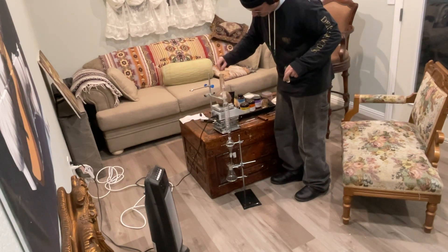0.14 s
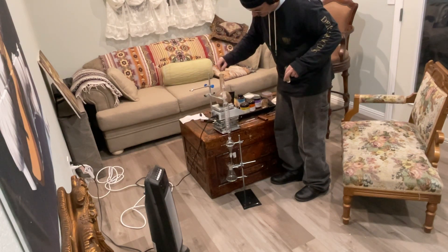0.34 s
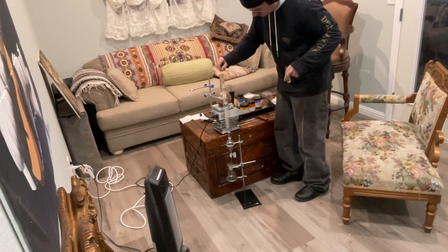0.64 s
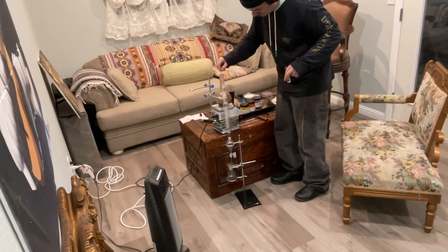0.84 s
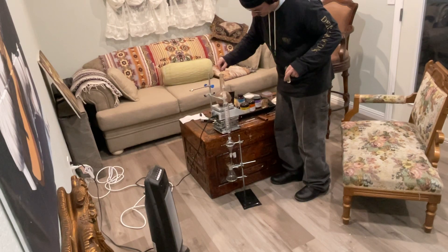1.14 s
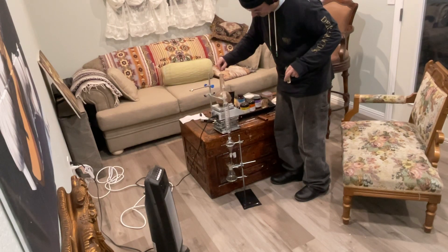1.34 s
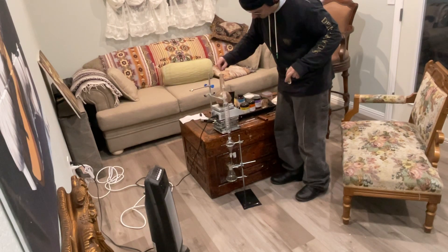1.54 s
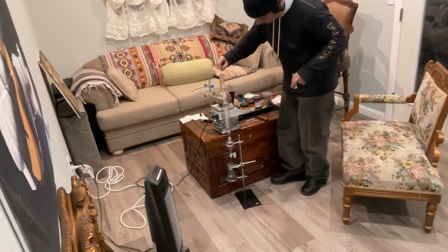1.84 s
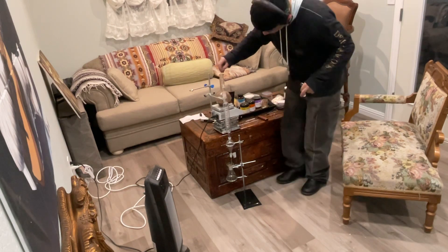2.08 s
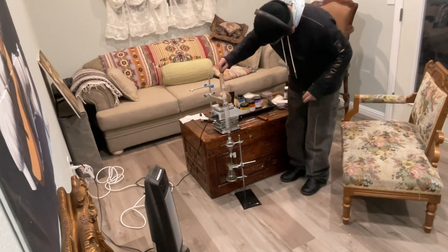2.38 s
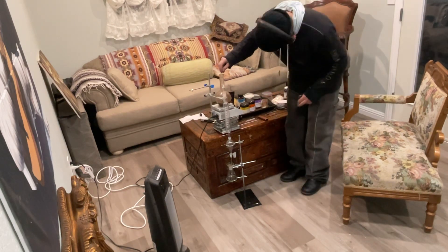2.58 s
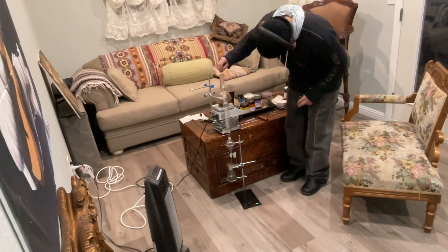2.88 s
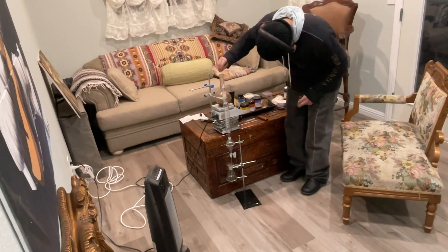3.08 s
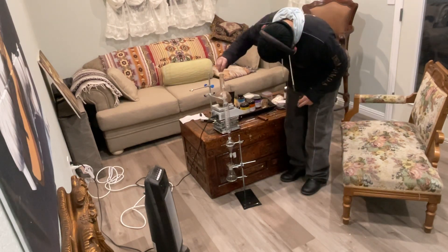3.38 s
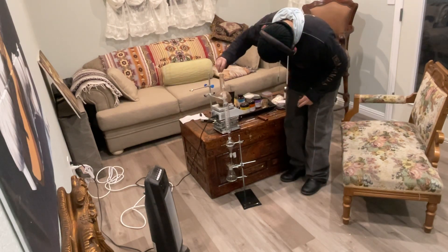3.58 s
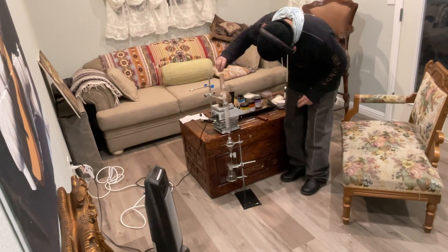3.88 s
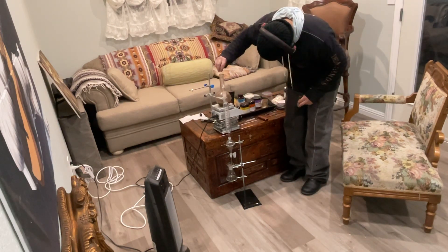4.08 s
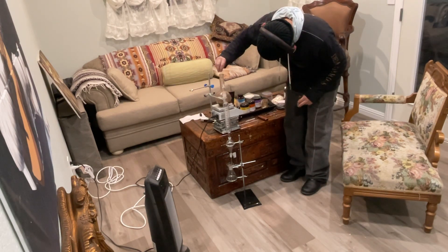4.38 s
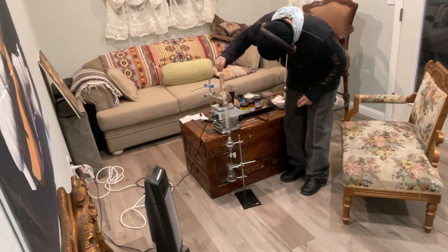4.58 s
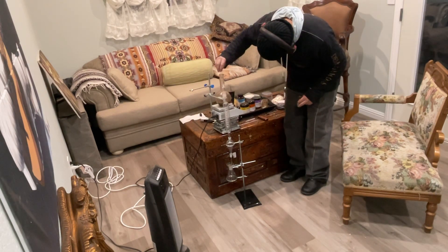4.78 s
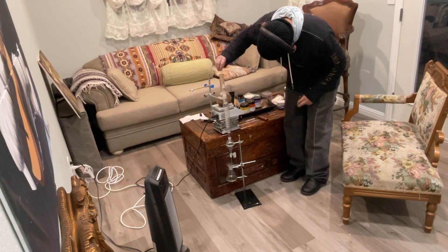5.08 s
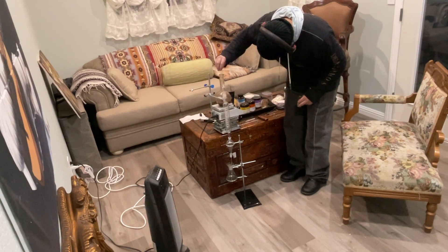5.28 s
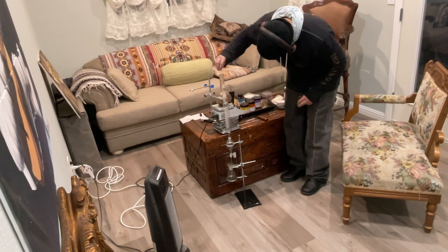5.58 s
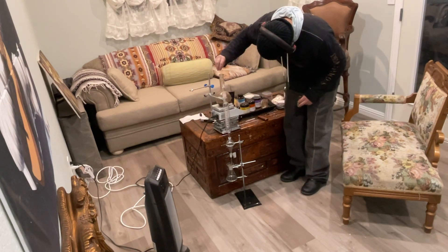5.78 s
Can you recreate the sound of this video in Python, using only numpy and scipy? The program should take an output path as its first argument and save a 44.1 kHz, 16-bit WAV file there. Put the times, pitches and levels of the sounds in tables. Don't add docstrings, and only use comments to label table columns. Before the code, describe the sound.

A small furnished room heard by a phone a few metres away, with a short soft reverberation. A low engine drone around 75 Hz comes through the walls, faint at first, swelling to its strongest near 1.5 s, throbbing and slightly rising in pitch around 2 s, then fluctuating, with another swell near 4.2 s. Beneath are faint fridge hum and quiet air. From 0.2 to 1.5 s there are light glass taps, tiny metallic ticks and dull stand thumps, one low at 0.5 s and a sharper tick at 1.36 s. A shoe scuffs briefly at 1.55 and 1.7 s, then drags longer at 2.1 s. Sparse faint taps follow until 3.6 s. From 3.7 to 4.9 s hard, bright glass clinks come irregularly, loudest at 4.2 s, often in close pairs, with gritty base scrapes and thin high ringing. They fade by 5.1 s, leaving faint rattles, ticks and thumps until 5.9 s.

```python
import sys
import numpy as np
from scipy import signal
from scipy.fft import rfft, irfft, next_fast_len
from scipy.io import wavfile
from scipy.ndimage import uniform_filter1d

SR = 44100
rng = np.random.default_rng(int(sys.argv[2]) if len(sys.argv) > 2 else 0)


def ratio(d):
    e = np.asarray(d, float) / 20
    return 10 ** e


def inscribe(sig):
    pcm = np.round(np.clip(np.atleast_2d(sig).T, -1, 1) * 32767)
    wavfile.write(sys.argv[1], SR, pcm.astype(np.int16))


N = 261697
T = np.arange(N) / SR
SIZE = next_fast_len(N + SR)
HZ = np.fft.rfftfreq(SIZE, 1 / SR) + 1e-3

# f/Hz, level/dB, t60/s
FLASK = [
    [(4242, -1.5, 0.21), (4287, -4, 0.17), (4324, -2, .3), (4680, -13.5, .1), (4800, -15, .1),
     (4900, -7, 0.13), (5120, -14.5, .08), (5220, -14.5, 0.098), (5860, -10, .09)],
    [(2390, -0.5, 0.17), (2386, -3, 0.19), (3100, -13.5, 0.12), (3610, -12, 0.14)],
    [(2813, -3, 0.063), (2860, 0.5, 0.12), (2884.4, 1, 0.13)],
    [(7070, -2.5, 0.26), (7200, -6.5, .12), (7255, -6, 0.17), (7570, -11.5, 0.066), (7660, -4, .1),
     (8360, -11.5, 0.047), (8180, -11, 0.046), (8770, -11, .06)],
    [(552, -6, .16), (946, -6.5, .15), (1435, -16, 0.13)],
    [(3270, -13, 0.033), (3630, -8.5, 0.16), (3720, -7.5, 0.06), (3980, -1.5, 0.12), (4045, -9, 0.097)],
    [(2204, -5.5, 0.094), (2270, -5, 0.11)],
]
# t/s, blow level/dB, then belly, shoulder and neck against
# the wall, level/dB
BLOWS = [(0.2793, -64, 8, 6, -9), (1.0281, -64, 7, -9, -9.5), (3.678, -67.5, 11, 7, -5),
         (3.712, -46.5, -2.5, -11, -2), (3.8025, -61, 3, -24, 9), (3.9587, -48, -4, -3, 0),
         (4.0618, -61, 12.5, -20, 0.5), (4.2142, -38, 7.5, -2, -7.5), (4.238, -45, -6, -10, -20),
         (4.5113, -45, -3.5, -11, -5.5), (4.5355, -44, -6, -24, -13), (4.6696, -45.5, -11, -16, 3.5),
         (4.685, -52.5, 5.5, -8, 6), (4.801, -43, -10, -0.5, -7), (4.824, -51.5, -12, -12, -5),
         (4.8678, -55, -15, -23, -8), (4.915, -58.5, -9, -20, -12), (4.96, -67.5, -14, -20, -17),
         (5.048, -73, -5, 9.5, -18), (5.0934, -66, -6, -1, -21),
         (0.1777, -67, -17, 5.5, -26), (0.2157, -62, 8, 0, -14), (0.5031, -67, 6, 6.5, -37),
        (1.2077, -67, -16, -15, -32.5), (1.091, -66.5, -11, -9, -31), (1.2798, -65, -20.5, 9, -30),
        (1.3608, -57.5, 6.5, -7, -29), (1.404, -64.5, -21, -11, -2), (1.5359, -58.5, 16.5, -20, -10),
        (2.2966, -60.5, 8, -2, -3.5), (2.562, -66.5, -21, 8.5, -8), (2.595, -67, -16, -1.5, -33),
        (2.9916, -69.5, -8, 14, -3), (3.132, -70.5, -3, 0.5, -14), (3.312, -65.5, -14, 7, -17),
        (3.348, -59.5, -23, -21, 0), (3.5036, -61.5, 18.5, 3, -8), (3.811, -60, 11.5, -23, -20),
        (4.1667, -62, -19, -17, -2), (4.3838, -70.5, -3, 11.5, -28), (3.479, -66, -22, -3, -26),
        (4.828, -74, -18, -16, -20), (4.9053, -74, -8, -8, -26), (3.413, -68.5, -19.5, -12, 3.5),
        (5.844, -67.5, 1, -11, -26)]
# t/s, bar rattle level/dB, stand shake level/dB
RATTLE = [(0.0, -100, -68.5), (0.4, -83.5, -63.5), (0.75, -93.5, -70.5), (1.01, -92.5, -66.5),
          (1.6, -84, -70.5), (2.2, -84.5, -71), (2.87, -92.5, -80), (3.5, -81.5, -71.5), (3.68, -90, -83),
          (4.1, -80.5, -76.5), (4.5, -82, -72.5), (4.9, -90.5, -74), (5.3, -84, -69.5), (5.7, -87.5, -79),
          (5.93, -74, -63)]
# t/s, half length/s, level change/dB
LULLS = [(1.29, 0.031, 0.5), (2.684, 0.068, 0), (3.76, .03, 3), (4.156, 0.035, -1), (4.477, 0.027, -6),
         (5.025, .04, -12), (5.674, 0.03, -12.5)]
# t/s, rim level/dB, lip level/dB, loose cap splash level/dB
TOPS = [(0.2163, -87, -80, -87), (0.2797, -75, -77, -68.5), (1.029, -64, -71.5, -88),
        (1.404, -78, -80, -77), (2.2962, -70, -92, -79), (3.7115, -55, -58, -85), (3.802, -63, -54, -60),
        (3.9607, -48, -58, -83), (4.0644, -73, -95, -66), (4.2147, -44, -52, -75),
        (4.5123, -45, -45.5, -77), (4.6718, -55, -61, -75), (4.685, -58, -59, -63),
        (4.802, -42.5, -47.5, -71), (5.0925, -73, -76, -80)]
# f/Hz, level/dB, t60/s
RIM = [(10360, -2.5, .11), (10430, 4.5, 0.15), (10510, -5.5, 0.1), (10520, -8, 0.063)]
# f/Hz, level/dB, t60/s
LIP = [(13900, -11.5, .1), (14200, -3.5, .11), (14310, 0, 0.18), (14450, -7, .11), (14800, -11, .09),
       (15200, -14, .07)]
# t/s, level/dB
GRIND = [(3.78, -70), (3.98, -65), (4.254, -69), (4.545, -61.5), (4.701, -64.5), (4.84, -71)]
# t/s, peak level/dB
TICKS = [(0.163, -77), (0.279, -64.5), (0.4277, -69.5), (0.46, -75), (0.6399, -80), (0.6882, -70),
         (0.936, -71.5), (1.3597, -56), (1.498, -77), (2.34, -69), (2.4397, -76.5), (4.062, -63.5),
         (2.7535, -69.5), (2.9013, -71), (2.928, -75), (2.9896, -76), (3.015, -73), (3.048, -68),
         (3.147, -76), (3.23, -74), (3.7108, -53.5), (3.8025, -58), (3.8995, -66), (4.5112, -57),
         (5.0958, -69), (5.1705, -73), (5.3333, -76), (5.5141, -66), (5.607, -78), (5.8373, -70)]
# t/s, peak level/dB, f/Hz
THUMPS = [(0.292, -51.5, 1007), (0.52, -46.5, 248), (0.832, -57.5, 582), (1.71, -52, 464),
          (2.963, -57.5, 578), (3.483, -60, 566), (3.785, -50, 552), (3.99, -53, 980), (4.02, -53, 550),
          (4.07, -53, 560), (4.295, -54.5, 961), (4.423, -59.5, 577), (4.514, -53.5, 540),
          (4.697, -64, 980), (4.84, -51, 917), (5.28, -66, 550), (5.532, -52.5, 900), (5.848, -60, 556),
          (1.36, -55, 990), (0.38, -60, 1024), (1.355, -56, 450), (2.359, -60.5, 946), (2.791, -59.5, 552),
          (4.633, -57, 540), (5.568, -55, 886)]
# start t/s, peak t/s, level/dB, release/s, heel level/dB
SCUFFS = [
    (1.485, 1.569, -55.5, 0.048, -0.5),
    (1.658, 1.701, -51, 0.068, 6),
    (1.968, 2.127, -43, 0.12, -2.5),
]
# f/Hz, level per Hz/dB
SOLE = [(400, 3.5), (700, 5.5), (1200, -4.5), (2000, -1), (3000, -1), (4200, -3.5), (6000, -3.5),
        (8000, -8), (10000, -10), (12500, -15), (15000, -14)]
# t/s, main path level/dB, brighter path round the house level/dB
ENGINE = [(0.0, -58.5, -80), (0.83, -44, -69), (0.96, -45, -60.5), (1.09, -38, -62.5), (1.44, -29.5, -55),
          (1.85, -33.5, -46), (2.12, -38, -52.5), (2.38, -42, -40.5), (2.8, -40, -50.5), (3.02, -49.5, -63),
          (3.45, -43.5, -49.5), (3.72, -56, -50), (3.83, -48.5, -77), (3.97, -38.5, -61), (4.2, -36, -51),
          (4.72, -49.5, -59.5), (5.4, -41.5, -74), (5.93, -44.5, -62)]
# t/s, f/Hz
FIRING = [(0, 74.5), (.9, 75), (1.5, 76), (1.9, 77.4), (2.5, 78.2), (3.4, 78), (3.9, 76), (4.3, 75.6),
          (4.8, 74.7), (5.93, 74.4)]
# order/1, centre t/s, half length/s, level/dB
PULLS = [(1.5, 1.996, 0.87, -42.5), (1.5, 3, 0.15, -50.5), (1.5, 3.66, 0.059, -47.5),
         (1.5, 4.66, 0.3, -55.5), (1.5, 5.75, 0.12, -49), (3, 1.704, 0.46, -56), (3, 2.625, 0.42, -57),
         (3, 3.92, 0.092, -62.5), (3, 4.65, 0.21, -62)]
# f/Hz, level per Hz/dB
AIR = [(28, -23.5), (42, -22.5), (56, -2), (100, -3.5), (180, -15), (300, -21.5), (500, -26.5), (900, -32),
       (1600, -38.5), (2600, -39.5), (4500, -64), (7000, -63), (10000, -63), (13500, -66.5), (15500, -76.5)]
# f/Hz, t60/s
ROOM_T60 = [(100, 0.28), (1000, 0.42), (4000, 0.32), (14000, 0.14)]
# f/Hz, right leads by phase/rad, likeness/1 (0 to 1), left minus right level/dB
SPREAD = [(30, 0, .995, 0), (200, -.15, .95, .4), (400, -.6, .76, 1.6), (750, -3.1, .3, 4),
          (1250, -6.2, .5, 1.4), (1700, -5.8, .3, -.5), (2600, -3.1, .6, -.6), (3700, 0, .85, .8),
          (4700, .9, .8, -1.2), (6300, .8, .7, -1), (8600, 2.1, .9, 0), (9400, 3.1, .95, 0),
          (10500, 3.65, .94, 0), (11300, 4.3, .8, 0), (12300, 4.9, .6, .6), (14000, 5.7, .9, 0)]

NECK_TILT, WALL_RING = 0.77, 0.84
BUZZ_DB, BUZZ_DB_PER_S = 4, 2
SPLASH_HZ, SPLASH_WIDTH_HZ, SPLASH_S = 11780, 510, 0.016
SNAP_DB, SNAP_S = 4.5, 0.001
GRIND_RISE_DB_S, GRIND_FALL_DB_S, GRIND_BUZZ_DB = 406, 182, 6.5
SCUFF_RISE_DB_S, SCUFF_HOLD_S = 181, 0.014
SCUFF_SPAN_DB, WEIGHT_PER_DB = 25, 0.75
THROB_HZ, THROB_S, THROB_DEPTH, IDLE_DB = 5.0, 1.635, 0.66, -68
SUB_DB, SUB_PER_DB = -42.5, 0.3
FRIDGE_HZ, FRIDGE_DB, FRIDGE_EASES_S, FRIDGE_DROP_DB = 178.3, -61.5, 0.73, -3
AIR_DB, AIR_PER_SHAKE = -52, 0.35
TRAFFIC_FADE_DB_S = -0.63


def along(table, hz, col=1):
    rows = np.array(table, float)
    return np.interp(np.log(hz), np.log(rows[:, 0]), rows[:, col])


def curves(table):
    s, *columns = np.transpose(table)
    return [np.interp(T, s, c) for c in columns]


def shape(x, gain):
    return irfft(rfft(x, SIZE) * gain, SIZE)[..., :N]


def low_pass(hz, order):
    return 1 / (1 + (HZ / hz) ** order)


def high_pass(hz, order):
    return 1 / (1 + (hz / HZ) ** order)


def octave(hz, k):
    return np.cos(np.pi / 2 * np.clip(np.log2(hz) - k, -1, 1)) ** 2


def unit(x):
    return x / np.sqrt(np.mean(x ** 2))


def walk(rate):
    k = int(SR / rate)
    held = np.repeat(rng.standard_normal(N // k + 1), k)
    return 1.33 * uniform_filter1d(uniform_filter1d(held, k), k)[:N]


def ring(push, hz, t60):
    r, w = np.exp(-np.log(1000) / (t60 * SR)), 2 * np.pi * hz / SR
    return signal.lfilter([0, np.sin(w)], [1, -2 * r * np.cos(w), r * r], push)


def pushes(s, size):
    return np.bincount(np.clip((np.asarray(s) * SR).astype(int), 0, N - 1), size, N)


def blow_parts(rows):
    blow_db, belly_db = rows[:, 1], rows[:, 1] + rows[:, 2]
    hard = np.maximum(blow_db + 55, 0)
    light = np.maximum(-52 - blow_db, 0)
    wall, belly = blow_db - 0.8 * light, belly_db - 0.8 * light
    shoulder_neck = rows[:, 3:] + rows[:, 1:2]
    stand = np.minimum(belly_db - 4.0, -50)
    lid, collar = blow_db - 0.9 * hard + 0.2 * light, belly_db - hard - 3
    return np.column_stack([wall, belly, shoulder_neck, stand, lid, collar]), light


def patter():
    rattle_db, shake_db = curves(RATTLE)
    loose_db = shake_db + BUZZ_DB + BUZZ_DB_PER_S * (T - 3)
    buzz_db = np.maximum(loose_db, rocking() + GRIND_BUZZ_DB) + lulls()
    size_db = np.minimum(3.0 * rng.exponential(size=N), 10) + 3.0 * walk(14)
    hits = (rng.random(N) < 220 / SR) * ratio(size_db)
    slide = hits * ratio(np.array([rattle_db] * 4 + [buzz_db] + [rattle_db] * 2))
    return slide * ratio(np.c_[[-17, -6, -7, -26, -7, -9, -14]])


def flask():
    rows = np.array(BLOWS)
    part_db, light = blow_parts(rows)
    slide = patter()
    modes = [(part, *mode) for part, group in enumerate(FLASK) for mode in group]
    scatter = rng.standard_normal((len(rows), len(modes)))
    out = np.zeros(N)
    contact_size = SR // 320
    window = np.hanning(contact_size)
    for k, (part, hz, db, t60) in enumerate(modes):
        lower_neck = part == 3 and hz < 9000
        tilt_db = NECK_TILT * np.minimum(light, 10) * np.sign(hz - 7500) * lower_neck
        blow_db = part_db[:, part] + tilt_db + 1.5 * scatter[:, k] - 6.0
        blows = pushes(rows[:, 0], ratio(blow_db) * np.sign(scatter[:, k - 1]))
        contact = window * np.cos(2 * np.pi * hz * T[:contact_size])
        blows = signal.oaconvolve(blows, contact * 2 / np.sum(window))[:N]
        waver = 0.57 + 0.47 * walk(75 + hz / 70)
        push = blows + slide[part] * rng.standard_normal(N)
        out += ratio(db) * waver * ring(push, hz, 0.5 * t60 * WALL_RING ** (part == 0))
    return out + weak_modes(rows, slide[2])


def weak_modes(rows, grains):
    t = T[:SR // 4]
    crack = ratio(-8) * np.exp(-t / 0.0016)
    late = ratio(-18.5) * np.exp(-t / 0.018) * np.minimum(t / 0.00075, 1)
    hits = pushes(rows[:, 0], ratio(rows[:, 1])) + grains
    wash = signal.fftconvolve(hits, crack + late)[:N] * rng.standard_normal(N)
    return shape(wash, high_pass(2000, 4) * low_pass(8600, 8) + ratio(-40) * (HZ > 9000))


def top():
    s, rim_db, lip_db, cap_db = np.transpose(TOPS)
    out, touch = np.zeros(N), np.hanning(64) / 16
    for blow_db, modes in ((rim_db, RIM), (lip_db, LIP)):
        for hz, db, t60 in modes:
            push = pushes(s, ratio(blow_db + db - 8.0 + 1.2 * rng.standard_normal(len(s))))
            push = signal.oaconvolve(push, touch * np.cos(2 * np.pi * hz * T[:len(touch)]))[:N]
            out += ratio(1.8 * walk(90)) * ring(push, hz, 0.81 * t60)
    cap, t = pushes(s, ratio(cap_db)), T[:SR // 8]
    splash = signal.oaconvolve(cap, np.exp(-t / SPLASH_S))[:N] * rng.standard_normal(N)
    snap = signal.oaconvolve(cap, np.exp(-t / SNAP_S))[:N] * rng.standard_normal(N)
    splash = shape(splash, 1 / (1 + ((HZ - SPLASH_HZ) / SPLASH_WIDTH_HZ) ** 4))
    return out + 3 * splash + ratio(SNAP_DB) * shape(snap, high_pass(8500, 6))


def lulls():
    return sum(db * np.exp(-((T - s) / half) ** 2) for s, half, db in LULLS)


def rocking():
    s, db = np.transpose(GRIND)[:, :, None]
    return np.max(db - np.maximum((s - T) * GRIND_RISE_DB_S, (T - s) * GRIND_FALL_DB_S), axis=0)


def grind():
    grit = rng.standard_normal(N) * ratio(2.0 * rng.exponential(size=N))
    return ratio(rocking() + 1.0) * unit(shape(grit, high_pass(700, 4) * low_pass(2000, 4)))


def ticks():
    s, db = np.transpose(TICKS)
    burst = np.convolve(pushes(s, ratio(db + 16.5)), np.exp(-T[:900] / 0.0029))[:N]
    push = burst * rng.standard_normal(N)
    return ratio(-39) * ring(push, 4870, 0.06) + shape(push, high_pass(4850, 24) * low_pass(6150, 16))


def thumps():
    out = sum(ring(pushes([s], [ratio(db - 4.5)]), hz, 0.13) for s, db, hz in THUMPS)
    return uniform_filter1d(out, size=12)


def scuffs():
    grit = shape(rng.standard_normal(N) * ratio(1.8 * rng.exponential(size=N)), ratio(along(SOLE, HZ)))
    low = low_pass(1500, 4)
    body = unit(shape(grit, low * (HZ > 300)))
    hiss = unit(shape(grit, 1 - low))
    air_part = shape(hiss, high_pass(6000, 4))
    out = np.zeros(N)
    for start, s, top_db, release, heel_db in SCUFFS:
        rise_db = np.maximum((s - SCUFF_HOLD_S - T) * SCUFF_RISE_DB_S, 0)
        fall_db = SCUFF_SPAN_DB * (T - s - SCUFF_HOLD_S) / release
        db = top_db - np.maximum(rise_db, fall_db)
        weight_db = np.minimum(WEIGHT_PER_DB * (-69.5 - db), 6) + heel_db * (T > s)
        dull = np.clip((-49.5 - db) / 25, 0, 0.9)
        on = np.clip((T - start) / 0.0067, 0, 1)
        drag = hiss - dull * air_part + ratio(weight_db + 3.0) * body
        out += on * ratio(db + 2.45 * walk(45.02) + 1.5) * drag
    return out


def pull(high):
    loads = [ratio(db) * np.exp(-((T - s) / half) ** 4) for k, s, half, db in PULLS if (k > 2) == high]
    return ratio(IDLE_DB - 8.8 * high) + sum(loads)


def engine():
    (hz,), (main_db, bright_db) = curves(FIRING), curves(ENGINE)
    turn = 2 * np.pi * np.cumsum(hz) / SR
    throb = 1 - THROB_DEPTH * np.sin(np.pi * THROB_HZ * (T - THROB_S)) ** 2
    orders = [(1, ratio(main_db)), (1.5, pull(False) * throb), (2, ratio(bright_db)), (3, pull(True)),
              (0.75, ratio(SUB_PER_DB * main_db + SUB_DB)), (2.5, ratio(bright_db - 14)),
              (4, pull(True) * ratio(-12))]
    out = np.zeros(N)
    for k, level in orders:
        waver = ratio(2.0 + 1.6 * walk(14))
        out += level * waver * np.sin(k * turn + 0.39 * k * walk(12) + 6 * rng.random())
    return out


def fridge():
    eased = np.clip((T - FRIDGE_EASES_S) / 0.25, 0, 1)
    db = FRIDGE_DB + FRIDGE_DROP_DB * eased + 2.9 * walk(3)
    return ratio(db) * np.sin(2 * np.pi * FRIDGE_HZ * T + 1.1 * walk(6))


def bands(spectrum, swell_db, flicker_db, flicker_rate):
    out, noise = 0, rfft(rng.standard_normal((2, SIZE))) * ratio(along(spectrum, HZ))
    for k in np.arange(4.5, 14.6, 1):
        band = irfft(noise * octave(HZ, k), SIZE)[:, :N]
        out = out + band * ratio(swell_db(2 ** k) + flicker_db * walk(flicker_rate))
    return out / np.sqrt(np.mean(irfft(noise, SIZE) ** 2))


def air():
    shake_db = curves(RATTLE)[1]
    swell = AIR_PER_SHAKE * (shake_db - np.mean(shake_db)) + lulls()

    def swell_db(hz):
        return swell * np.clip(np.log2(hz / 200) / 5.0, 0, 1) + TRAFFIC_FADE_DB_S * (T - 3) * (hz < 400)

    return ratio(AIR_DB) * bands(AIR, swell_db, 1.95, 11)


def room(x, wet_db):
    t, tails = T[:SR // 2], 0
    noise = rfft(rng.standard_normal((2, SR // 2)))
    hz = np.fft.rfftfreq(SR // 2, 1 / SR) + 1e-3
    for k in np.arange(6, 15):
        decay = ratio(-60 * t / along(ROOM_T60, 2. ** k))
        tails = tails + irfft(noise * octave(hz, k)) * decay
    tails = tails * np.minimum(t / 0.0044, 1) * ratio(wet_db) * np.array([[1], [ratio(4.5)]])
    tails[0, 0] = 1
    return shape(x, rfft(tails, SIZE))


def scene():
    near = ratio(2.5) * (flask() + top()) + ticks() + thumps() + grind()
    drone = engine() + fridge()
    far = np.array([drone, np.roll(drone, shift=145)])
    return room(near, -27.5) + room(ratio(-1.5) * scuffs(), -34.5) + far + air()


def roll_off(x):
    return signal.sosfilt(signal.butter(12, 16460, fs=SR, output="sos"), x)


def record(dry):
    lead, like, pan_db = (along(SPREAD, HZ, col=c) for c in (1, 2, 3))
    like = np.clip(like, 0, 1)
    spectra = rfft(dry * np.minimum(T / 0.006, 1), SIZE)
    same, apart = spectra * np.sqrt([(1 + like) / 2, (1 - like) / 2]) * low_pass(15650, 90)
    left = (same + apart) * ratio(pan_db / 2) * np.exp(-0.5j * lead)
    right = (same - apart) * ratio(-pan_db / 2) * np.exp(0.5j * lead)
    return roll_off(irfft([left, right], SIZE)[:, :N])


dry = scene()
out = record(dry)
inscribe(out)
```